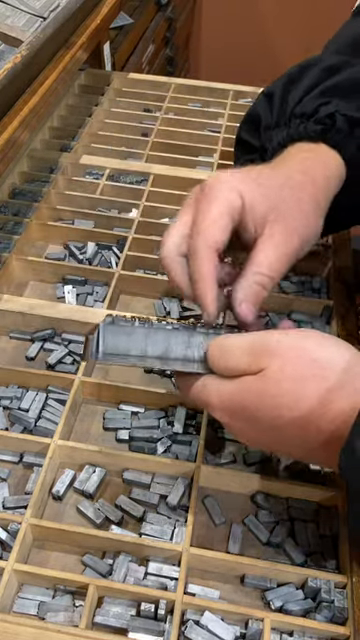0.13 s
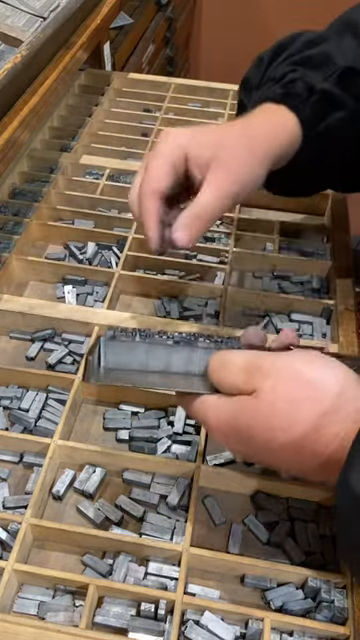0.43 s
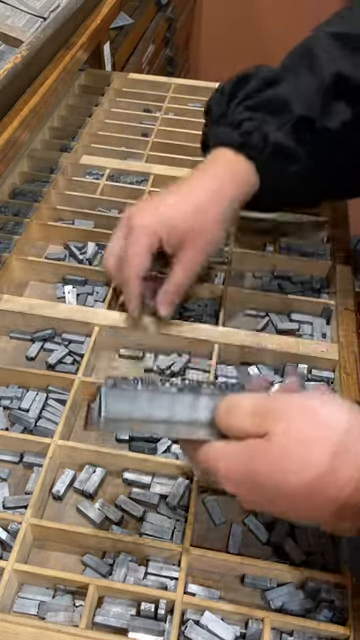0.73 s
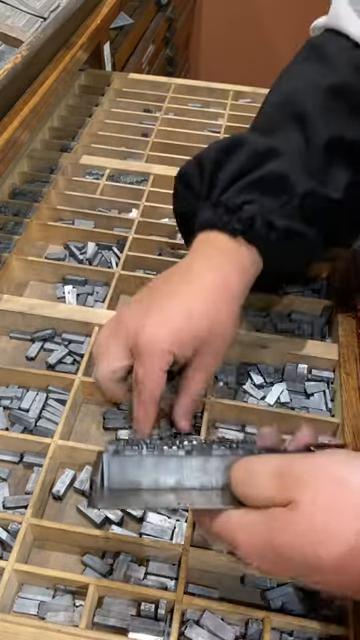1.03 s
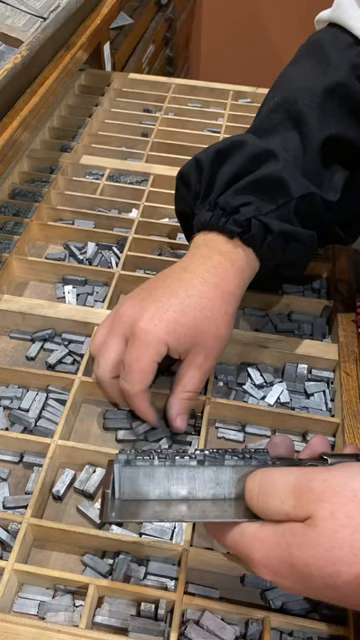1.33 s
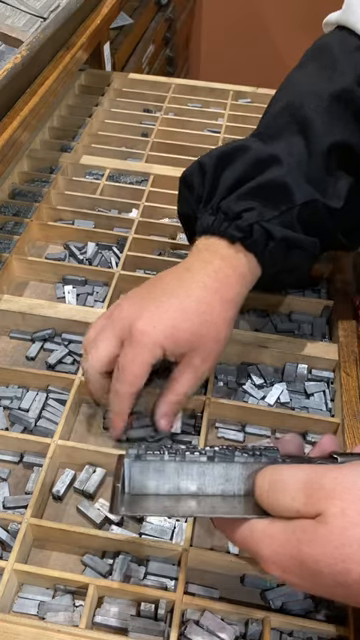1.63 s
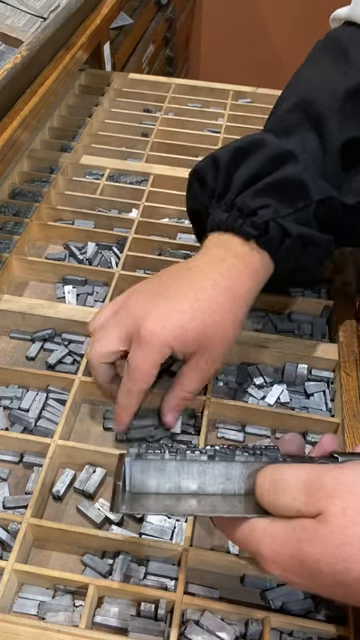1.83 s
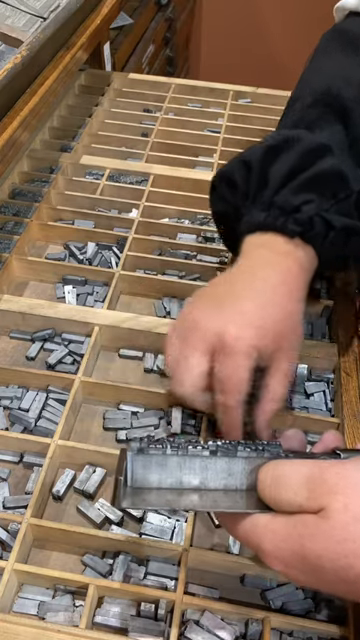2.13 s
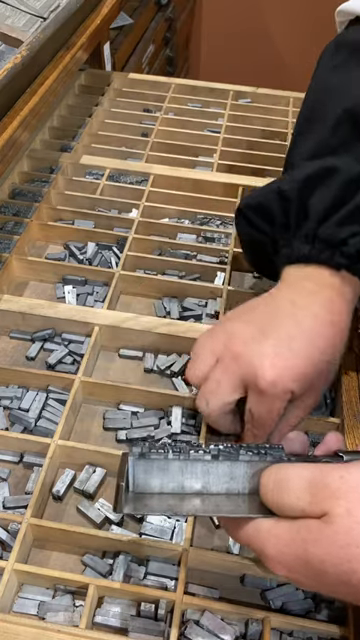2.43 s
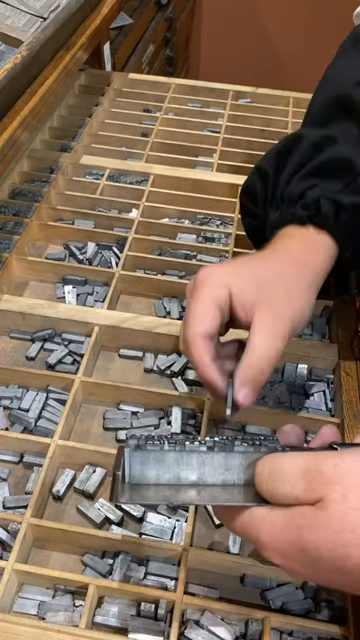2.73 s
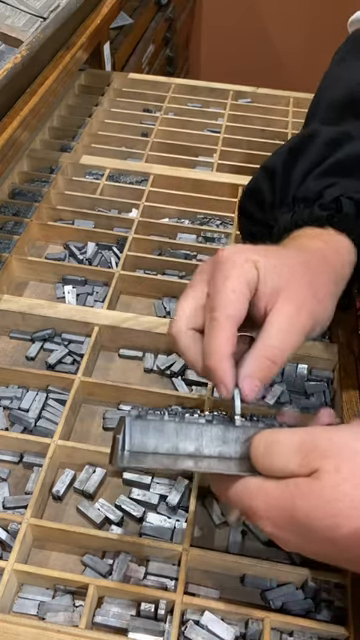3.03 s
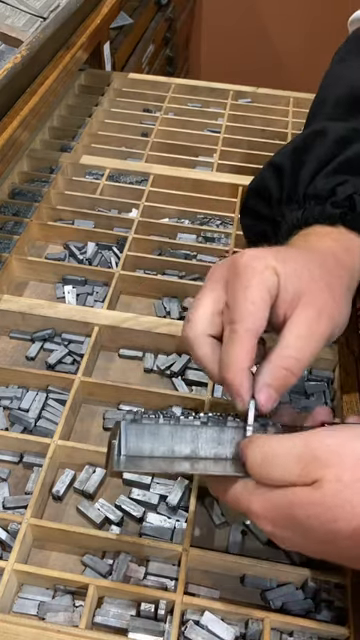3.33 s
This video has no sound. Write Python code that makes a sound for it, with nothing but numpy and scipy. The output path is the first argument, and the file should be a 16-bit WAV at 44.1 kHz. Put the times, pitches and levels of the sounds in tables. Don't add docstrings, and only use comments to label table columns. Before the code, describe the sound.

Small metal type pieces snap sharply into a steel holder, then tumble and rattle in a wooden case, settle, are lightly picked through, and snap in again; small room, ventilation hum, close phone microphone.

```python
import sys
import numpy as np
from scipy import signal
from scipy.fft import rfft, irfft
from scipy.io import wavfile
from scipy.ndimage import uniform_filter1d

SR = 44100
rng = np.random.default_rng(int(sys.argv[2]) if len(sys.argv) > 2 else 0)


def master(y):
    cut = np.clip(np.atleast_2d(y).T, -1, 1)
    pcm = np.round(cut * 32767)
    wavfile.write(sys.argv[1], SR, pcm.astype(np.int16))


def makeup_ratio(level_db):
    decades = np.asarray(level_db, float) / 20
    return 10 ** decades


N = 153468

# frequency in Hz, level in dB per Hz.
AIR_SPECTRUM = [(22, -4), (55, -35), (80, -23), (400, -32), (1000, -45.5), (2500, -54), (6000, -61.5),
                (15000, -66.5)]
# centre in Hz, width in Hz, level in dB.
DUCT_RESONANCES = [(40, 16, -39), (121.2, 15, -52.5), (271.3, 62, -55)]
# start in seconds, length in seconds, level in dB,
# tilt in dB per octave, ring of the piece in Hz.
CASE_SLIDES = [
    (0.251, 0.96, -66, 6.5, 1780),
    (1.025, 0.26, -47.5, 2.5, 1820),
    (1.189, 0.25, -40.5, -1, 2390),
    (1.331, 0.34, -47, -1, 2180),
    (1.55, 0.28, -58, -3.5, 2500),
    (2.29, 0.11, -58, -1, 4500),
    (2.412, 0.097, -52.5, 1, 1674),
    (2.512, 0.13, -52, 7, 2000),
    (2.585, 0.063, -41.5, 6, 1700),
    (2.6, 0.16, -54.5, -4, 1750),
]
HOLDER_RUBS = [
    (-.09, 0.3, -58.5, 0.5, 3440),
    (.4, 0.26, -61.5, 3, 5850),
    (2.3, 0.59, -64, 1.5, 5800),
    (3.04, 0.24, -60.5, 1.5, 3480),
    (3.354, 0.21, -60, 0.5, 3410),
]
# time in seconds, peak level in dB.
FLOOR_THUMPS = [
    (1.052, -32.5),
    (1.3195, -30.5),
    (1.35, -35),
    (1.379, -38),
    (1.418, -26),
    (1.441, -35),
    (1.474, -34),
    (1.587, -40),
    (1.661, -34),
    (1.928, -40),
]
# time in seconds, peak level in dB,
# ring of the piece in Hz, tilt in dB per octave, boost of the low modes in dB.
HOLDER_SNAPS = [(.0085, 0, 4550, 0, -2.5), (.0355, -49, 3320, 4, 7), (.1176, -3, 2780, 1, 0),
                (.1375, -18, 8170, 2, 0), (.146, -28.5, 1740, -7, 0), (.224, -41, 2100, 1, -5),
                (3.0555, -27, 3054, 3, 1.5), (3.06, -44, 2630, 4, -2), (3.0682, 0.5, 4880, -0.5, 2),
                (3.152, -40, 1800, -4, -2), (3.3515, -42, 2970, -6, 16), (3.3602, -4.5, 2660, -2.5, 0),
                (3.4285, -28, 2580, -6.5, 11), (3.4695, -27.5, 2500, 4, 10), (3.472, -21, 8640, -1, -2)]
CASE_TUMBLE = [(1.0405, -30.5, 3500, 2, 9.5), (1.044, -16, 7020, 1.5, 5), (1.047, -17.5, 3800, 3.5, -11),
               (1.0508, 0.5, 4060, 5.5, 5.5), (1.0527, -0.5, 4940, 5.5, 0.5), (1.0575, -14, 2420, 0.5, 0.5),
               (1.0703, -24, 2190, -4, -1), (1.1193, -6, 3180, 12, -3), (1.125, -18, 2030, 3, -10.5),
               (1.1735, -11, 1580, -3, -11), (1.213, -31, 2200, 8, -4), (1.2275, -30, 3800, 3.5, -8),
               (1.2343, -14.5, 2140, 6, -15), (1.2455, -12, 3950, -1, -9.5), (1.254, -15, 4150, -1, -10),
               (1.2598, -14, 2350, 1, 4), (1.2648, -9, 2300, -4, -5), (1.272, -21.5, 2100, 1, -5),
               (1.277, -22, 3800, 0.5, -4.5), (1.282, -30, 7240, 8, -10), (1.286, -3.5, 2900, 1.5, -13),
               (1.292, -30.5, 2570, -12, -11), (1.302, -35, 2190, -15, 7), (1.3105, -35, 2380, -13, -4),
               (1.319, -18, 2120, 7, 0), (1.336, -18, 3650, 2, -8)]
CASE_SETTLE = [(1.346, -13.5, 3765, -1, -3.5), (1.38, -13, 2060, -7, 5.5), (1.417, -2.5, 2150, -3, 2),
               (1.423, -3, 2140, 2, 0), (1.4262, -8.5, 2130, 6, -9), (1.437, -17, 2140, -10, 5),
               (1.441, -19, 2250, -3, 1), (1.445, -18, 2130, -2, -3), (1.474, -13, 3800, 3, -2),
               (1.486, -28, 3900, -4, -3), (1.498, -30, 1980, -1, -6), (1.519, -32, 2150, 8, -3),
               (1.538, -25.5, 3630, -2, -11), (1.585, -24.5, 2400, 6, -14), (1.597, -34.5, 2400, 2, 3.5),
               (1.6227, -38, 2200, 4, -13), (1.629, -30.5, 2300, 2, -5), (1.6517, -37, 1250, 4, 0),
               (1.662, -20.5, 3010, 1.5, -6), (1.912, -35, 2940, 4, -7.5), (1.928, -30.5, 2270, 0.5, -10)]
CASE_PICKS = [(2.316, -32.5, 1565, -18, 3), (2.373, -39, 1476, -9, 8), (2.389, -42, 5800, -4, -10),
              (2.436, -41, 1680, 12, -5), (2.533, -36, 2040, -27, -4), (2.563, -19, 1640, -18, 5.5),
              (2.57, -33.5, 1950, 8, -13), (2.594, -20, 1620, -24, 11), (2.601, -20.5, 1700, 1, -5),
              (2.607, -22, 1650, -19, -4), (2.612, -32, 5050, -6, 9), (2.6185, -17, 1700, -32, -2),
              (2.632, -36, 1975, 5, -13), (2.6375, -27, 1900, -23, 0)]
# frequency in Hz, level in dB, t60 in seconds.
CASE_MODES = [(634, -36.5, .015), (908, -10, 0.018), (1214, -12.5, 0.018), (1700, -19.5, 0.017),
              (2157, -6, 0.011), (2870, -18, 0.016), (3800, -8, 0.007), (4674, -16, 0.0065),
              (5360, -13, 0.0042), (6260, -18, 0.0032), (7890, -30.5, 0.0058), (9500, -46, .008),
              (11200, -39.5, 0.0025), (14000, -38, .004)]
FLOOR_MODES = [(380, 0, .07), (450, -3, .05), (300, -6, .05)]
HOLDER_MODES = [(1050, -19.5, 0.0209), (1748, -20, .04), (2150, -4.5, 0.0069), (2682, 5.5, 0.006),
                (3330, -6, 0.011), (3860, -7.5, 0.0083), (4610, -2.5, 0.0066), (5740, -5.5, 0.0077),
                (6596, -11, 0.009), (7300, -9, 0.0048), (8060, -19.5, .022), (9020, -18.5, 0.0057),
                (11000, -23.5, 0.0047), (14200, -29, .004)]
WALL_MODES = [(1746, 1.5, 0.027), (2536, -3.5, .03), (3310, -1.5, 0.027), (3950, -5, 0.023),
              (4905, -10.5, 0.033), (5950, -13, 0.054), (6750, -10, 0.029), (7700, -12.5, 0.037)]


def unit(x):
    return x / np.sqrt(np.mean(x ** 2))


def shaped(gain):
    hz = np.fft.rfftfreq(N, 1 / SR) + 1
    return irfft(rfft(rng.standard_normal(N)) * gain(hz), N)


def walk(rate):
    hold = int(SR / rate)
    levels = np.repeat(rng.standard_normal(N // hold + 1), hold)
    return uniform_filter1d(uniform_filter1d(levels, hold), hold)[:N]


def highpass(x, hz):
    return signal.sosfilt(signal.butter(2, hz, "high", fs=SR, output="sos"), x)


def air():
    level_db, swell_db, flicker_db = -36.5, .6, 1.1
    hz, db = np.array(AIR_SPECTRUM, float).T

    def band_gain(f, mid):
        spectrum = makeup_ratio(np.interp(np.log(f), np.log(hz), db))
        return spectrum * np.clip(1 - np.abs(np.log2(f / mid)), 0, 1) ** .5

    rush, swell = 0, walk(0.57)
    for mid in 16 * 2. ** np.arange(11):
        band = shaped(lambda f: band_gain(f, mid))
        rush = rush + band * makeup_ratio(swell_db * swell + flicker_db * walk(8))
    hum = 0
    for centre, width, hum_db in DUCT_RESONANCES:
        hum = hum + makeup_ratio(hum_db) * unit(shaped(lambda f: 1 / (1 + (2 * (f - centre) / width) ** 2)))
    return makeup_ratio(level_db) * unit(rush) + hum


def room(x):
    t60_s, onset_s, level_db, top_hz = .32, .012, -27, 5000
    t = np.arange(SR // 2) / SR
    envelope = np.exp(-np.log(1000) * t / t60_s) * (1 - np.exp(-(t / onset_s) ** 2))
    tail = rng.standard_normal(len(t)) * envelope
    tail = signal.sosfilt(signal.butter(1, top_hz, fs=SR, output="sos"), tail)
    return makeup_ratio(level_db) * signal.fftconvolve(x, tail / np.sqrt(np.sum(tail ** 2)))[:N]


def ring(modes, tilt_db, low_db=0., blur=0.92, detune=0.015):
    scatter_db, phase_spread, contact_cycles = 1.5, .8, 0.68
    low_top_hz, thump_hz, tilt_top_hz = 1400, 500, 8000
    t = np.arange(4096)[:, None] / SR
    hz, db, t60 = np.array(modes, float).T
    chance = rng.standard_normal((3, len(hz)))
    low = low_db * (hz > thump_hz)
    tilt = tilt_db * np.log2(np.minimum(hz, tilt_top_hz) / 3000)
    size = makeup_ratio(db + scatter_db * chance[0] + np.where(hz < low_top_hz, low, tilt))
    decay = np.exp(-np.log(1000) * t * blur / t60)
    onset = 1 - np.exp(-(t * hz / contact_cycles) ** 2)
    phase = np.pi * np.arange(len(hz)) + phase_spread * chance[2]
    tone = np.sin(2 * np.pi * hz * (1 + detune * chance[1]) * t + phase)
    return (size * decay * onset * tone).sum(axis=1)


def slides(rows, modes, blur, detune):
    grains_per_s, grain_spread_db, swell_skew = 350, 3.5, .7
    ring_db, ring_t60_s = -13, .04
    hiss_db, hiss_hz = -27, 6500
    lead_s = .1
    out = np.zeros(N + SR)
    for start, length, db, tilt_db, hz in rows:
        n, rubbing, touch = int(length * SR), 0, 0
        swell = np.sin(np.pi * (np.arange(n) / n) ** swell_skew) ** 2
        for spot in range(6):
            chance = rng.random((3, SR))[:, :n]
            hits = (chance[0] < grains_per_s / SR) * np.sign(chance[1] - .5)
            grains = hits * makeup_ratio(-grain_spread_db * np.log(chance[2] + .03)) * swell
            body = ring(list(modes) + [(hz, ring_db, ring_t60_s)], tilt_db, blur=blur, detune=detune)
            rubbing = rubbing + signal.fftconvolve(grains, body[:2048])
            touch = touch + grains ** 2
        hiss = rng.standard_normal(SR)[:n] * np.abs(uniform_filter1d(touch, size=128)) ** .5
        hiss = unit(highpass(hiss, hiss_hz))
        y = unit(rubbing) + makeup_ratio(hiss_db + tilt_db) * np.pad(hiss, (0, 2047))
        i = int((start + lead_s) * SR)
        out[i:i + len(y)] += makeup_ratio(db) * unit(y)
    return out[int(lead_s * SR):][:N]


def thumps():
    out = np.zeros(N)
    for start, db in FLOOR_THUMPS:
        y = ring(FLOOR_MODES, 0)
        out[int(start * SR):][:4096] += makeup_ratio(db) * y / np.abs(y).max()
    return out


def knocks(rows, body, chatter_ms, rebound_db, crack_db, count=8):
    piece_db, piece_t60_s = -3, .007
    crack_hz, crack_s = 7000, .0014
    out, t = np.zeros(N + 8192), np.arange(1024) / SR
    for start, db, hz, tilt_db, low_db in rows:
        y = np.zeros(8192)
        late = rng.exponential(size=count) * (np.arange(count) > 0)
        for k in range(count):
            contact = ring(list(body) + [(hz, piece_db, piece_t60_s)], tilt_db, low_db)
            at = min(int(chatter_ms * late[k] * SR / 1000), 4000)
            y[at:at + 4096] += contact * makeup_ratio(rebound_db * (k > 0)) * np.exp(-late[k] / 2)
        y = y / np.abs(y).max()
        crack = highpass(rng.standard_normal(1024), crack_hz) * t / crack_s * np.exp(1 - t / crack_s)
        y[:1024] += makeup_ratio(crack_db + tilt_db) * crack
        i = int(start * SR)
        out[i:i + 8192] += (makeup_ratio(db) * y)[:len(out) - i]
    return out[:N]


def scene():
    background = air()
    case = slides(CASE_SLIDES, CASE_MODES, blur=2.4, detune=.07)
    case = case + slides(HOLDER_RUBS, WALL_MODES, blur=1.9, detune=.035)
    case = case + thumps()
    falling = list(CASE_TUMBLE) + list(CASE_PICKS)
    case = case + knocks(falling, CASE_MODES, chatter_ms=1.2, rebound_db=-1, crack_db=-46)
    case = case + knocks(CASE_SETTLE, CASE_MODES, chatter_ms=1.2, rebound_db=-3.5, crack_db=-48)
    holder = knocks(HOLDER_SNAPS, HOLDER_MODES, chatter_ms=1.5, rebound_db=-12, crack_db=-45)
    return (holder + case + room(case + makeup_ratio(-9) * holder) + background)[None]


def top_cut(x):
    return signal.sosfilt(signal.butter(12, 16330, fs=SR, output="sos"), x)


def record(dry):
    x = signal.sosfilt(signal.butter(10, 15100, fs=SR, output="sos"), dry)
    return top_cut(np.clip(x, -1, 1))


dry = scene()
out = record(dry)
master(out)
```